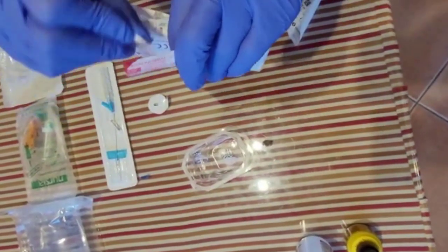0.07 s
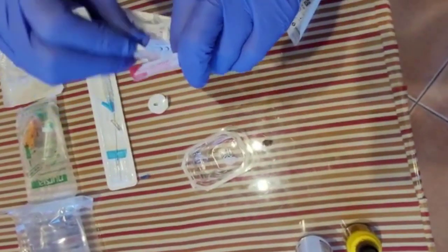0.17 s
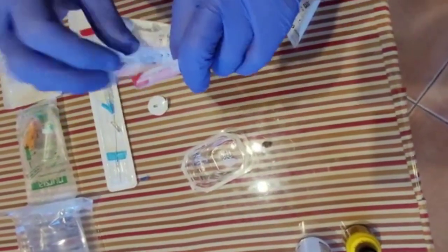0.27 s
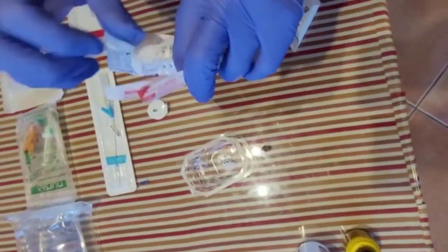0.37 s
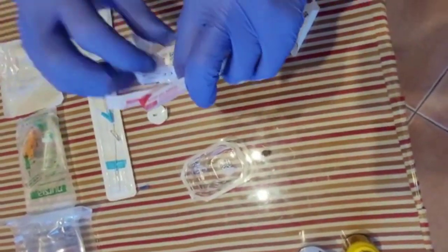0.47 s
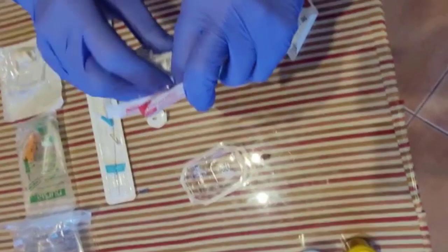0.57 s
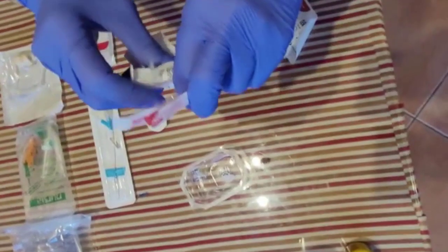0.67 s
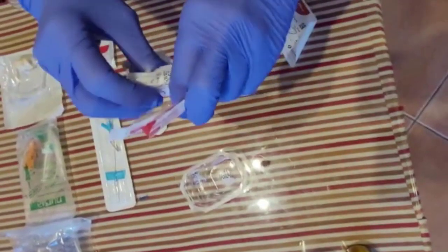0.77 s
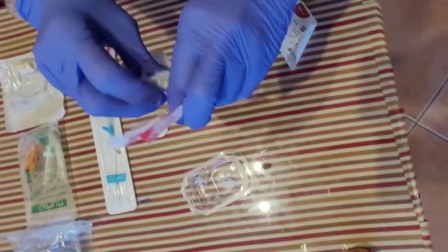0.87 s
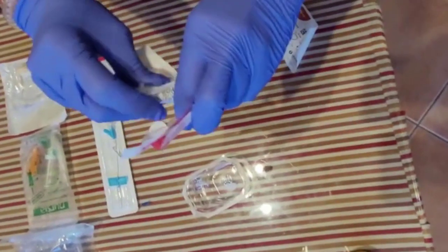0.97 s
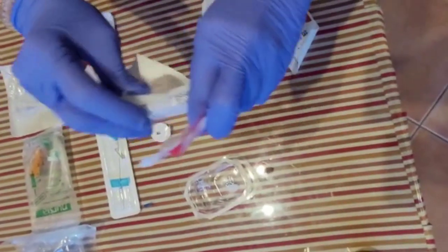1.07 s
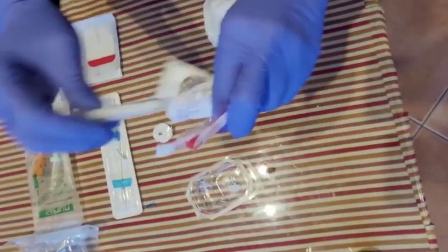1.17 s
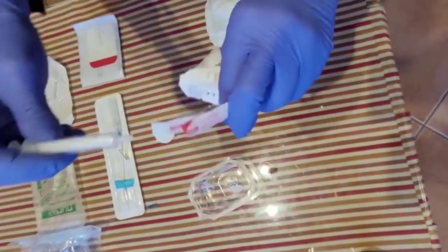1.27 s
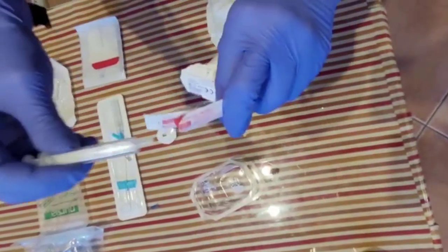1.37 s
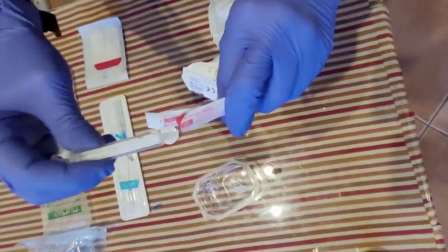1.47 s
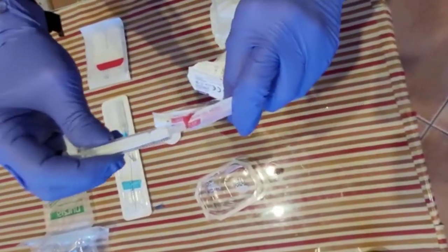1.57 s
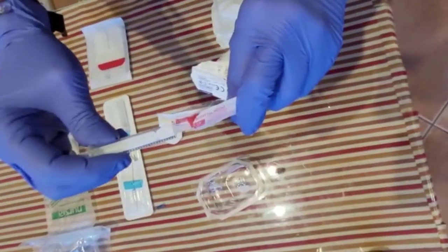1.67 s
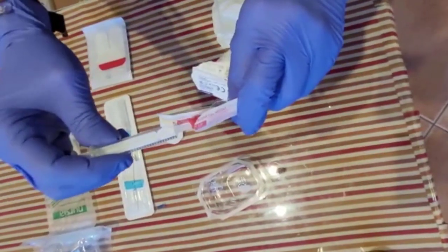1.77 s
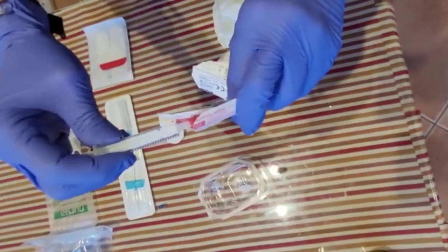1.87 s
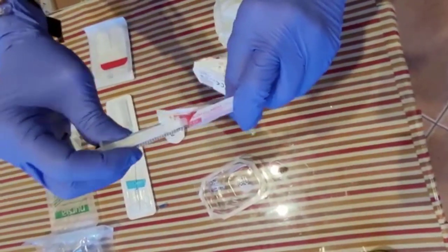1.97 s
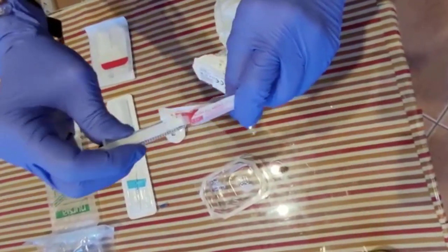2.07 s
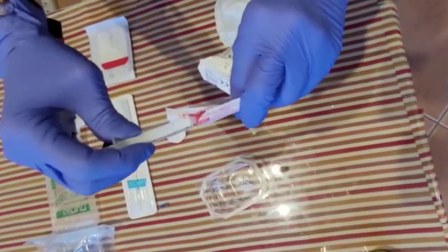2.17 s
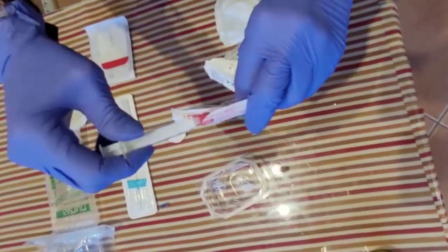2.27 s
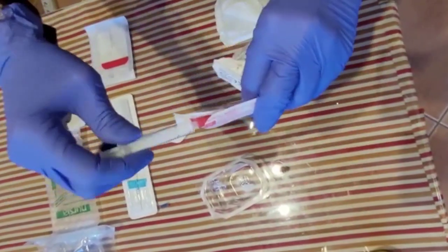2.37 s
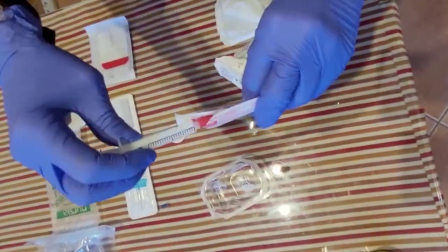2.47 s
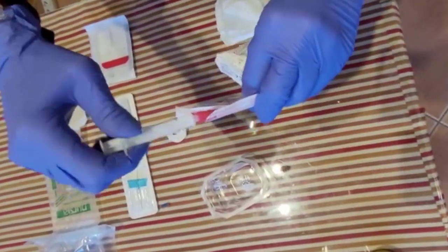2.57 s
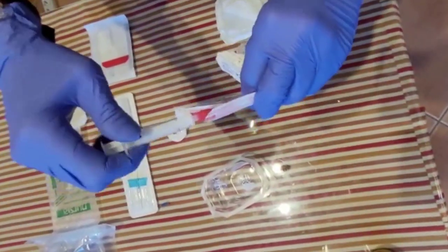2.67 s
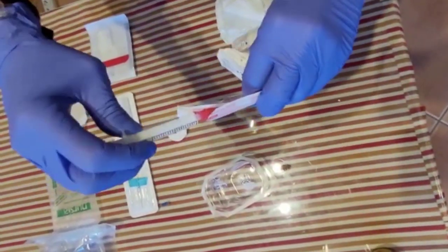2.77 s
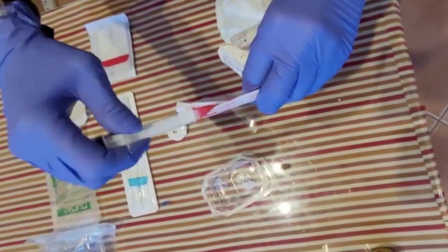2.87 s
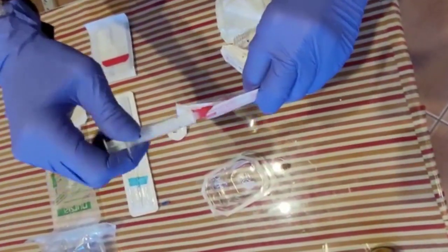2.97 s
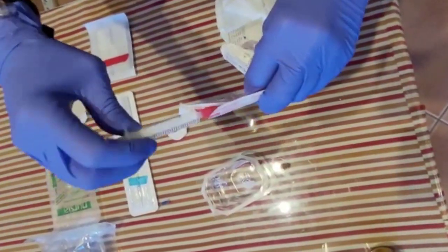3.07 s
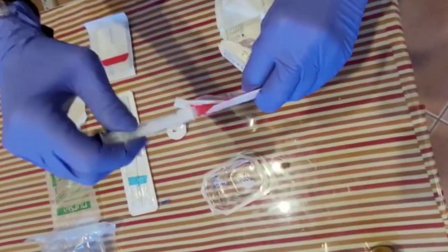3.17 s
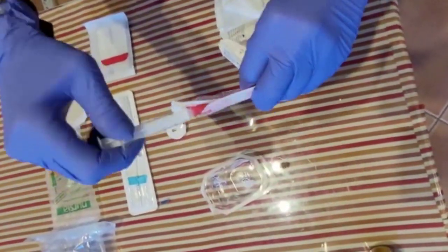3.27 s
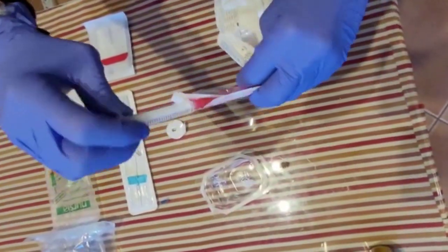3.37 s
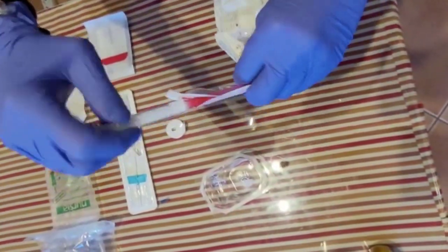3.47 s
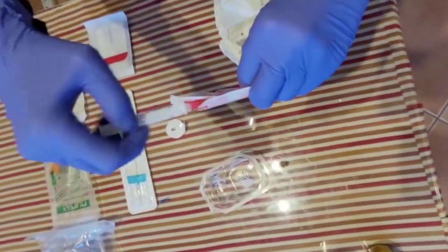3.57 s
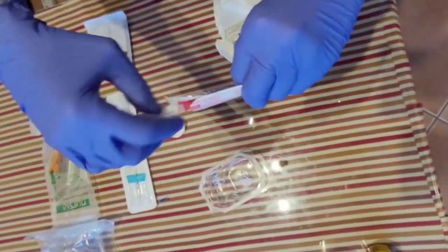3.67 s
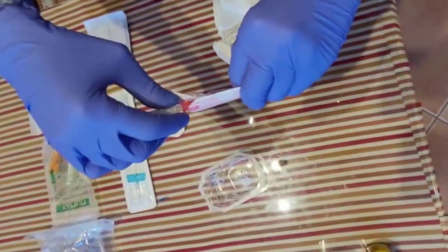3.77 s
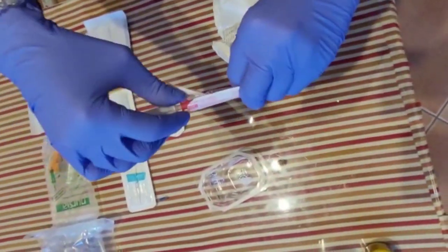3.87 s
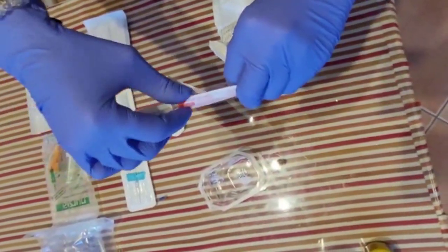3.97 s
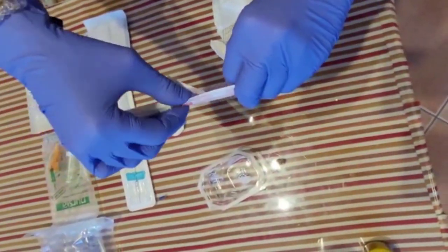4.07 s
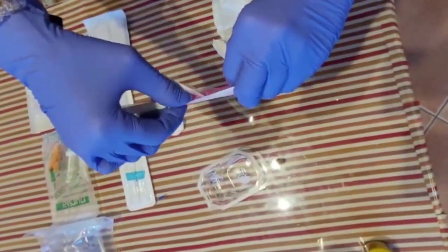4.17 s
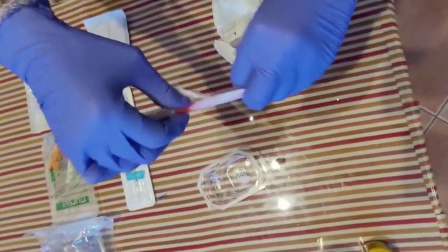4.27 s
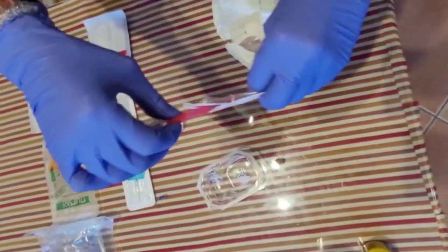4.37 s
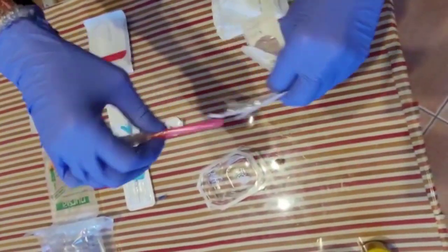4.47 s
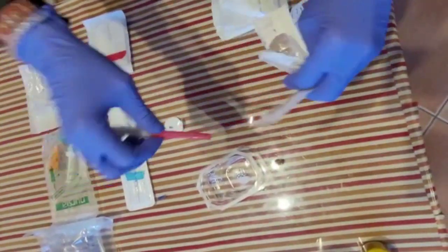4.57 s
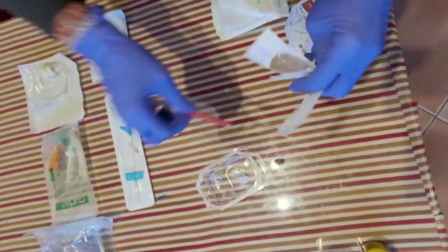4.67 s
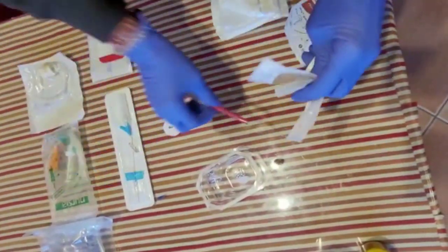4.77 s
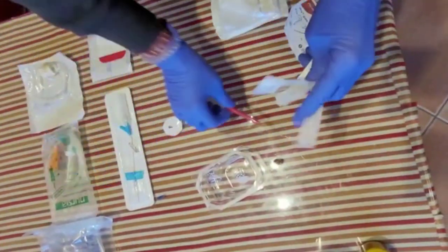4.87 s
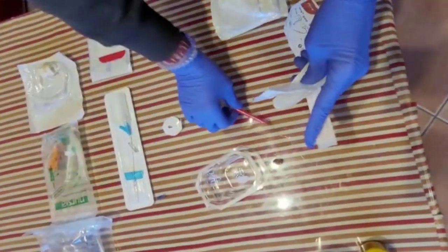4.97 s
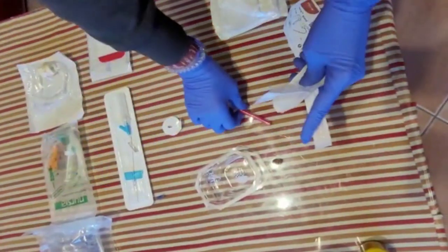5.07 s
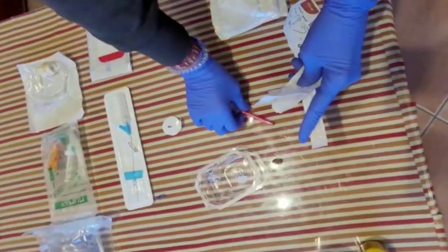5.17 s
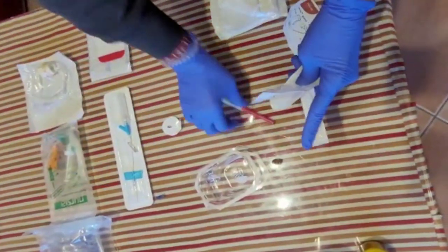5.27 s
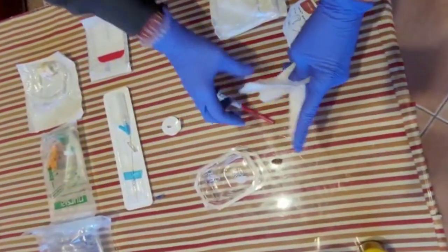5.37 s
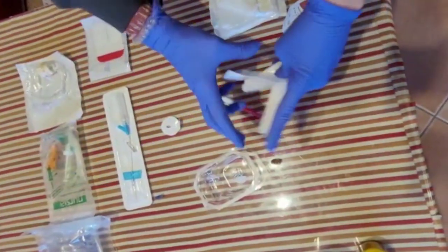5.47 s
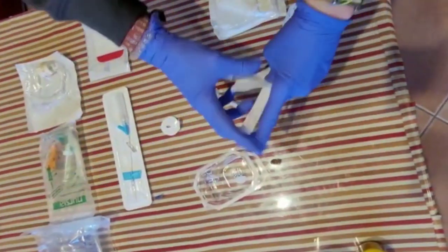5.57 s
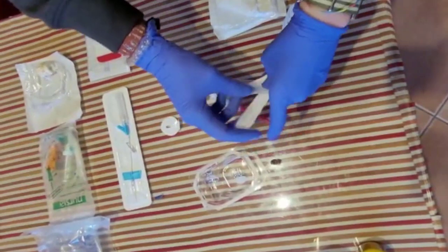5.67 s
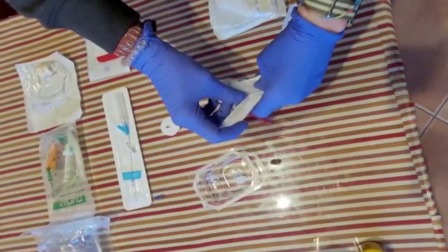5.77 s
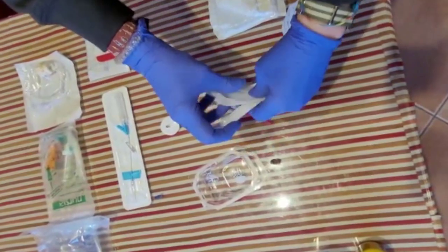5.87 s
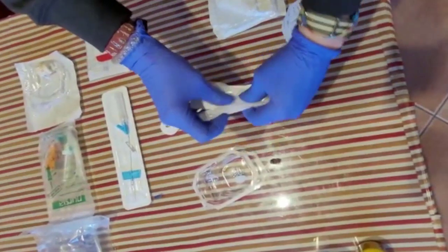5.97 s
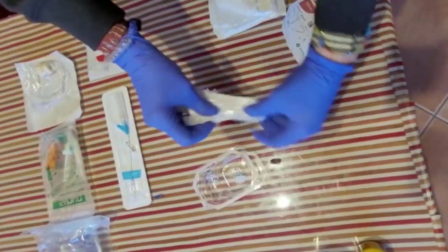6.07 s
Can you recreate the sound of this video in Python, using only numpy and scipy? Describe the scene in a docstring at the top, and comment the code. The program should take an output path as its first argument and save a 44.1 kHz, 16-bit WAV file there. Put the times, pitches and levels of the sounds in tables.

```python
"""A small room, a stereo microphone close to gloved hands; still air and a faint hum run throughout.
From the start the hands peel a paper-and-film sleeve and pull a thin tool free; from about 1.9 s they finger
it lightly; from about 4.3 s the sleeve slides off and is crumpled. Creases are short bursts through resonances,
rustle is tiny ringing clicks over coloured noise, and now and then a damped low ring makes the pack thud."""
import sys
import numpy as np
from scipy import signal
from scipy.fft import rfft, irfft, next_fast_len
from scipy.io import wavfile

SR = 44100
rng = np.random.default_rng(int(sys.argv[2]) if len(sys.argv) > 2 else 0)


def master_out(mix):
    """Clip the mix to full scale and print it as 16-bit PCM to the path in sys.argv[1]."""
    frames = np.transpose(np.atleast_2d(mix))
    ceiling = np.clip(frames, -1, 1)
    pcm = np.round(ceiling * 32767).astype(np.int16)
    wavfile.write(sys.argv[1], SR, pcm)


N = 270244
TIME = np.arange(N) / SR
PORT_LAG_S = .00012  # usual lateness of the right microphone port


def from_db(db):
    """Decibels to amplitude gain."""
    return 10 ** (np.asarray(db) / 20)


def rms_one(x):
    """Scale to rms 1 over all channels."""
    return x / np.sqrt(np.mean(x ** 2) + 1e-20)


def unit_energy(x):
    """Scale each channel to energy 1."""
    return x / np.sqrt(np.sum(x ** 2, axis=-1, keepdims=True) + 1e-20)


def at_hz(points, hz):
    """Read a table of frequencies and values on a log-frequency axis."""
    table_hz, value = np.transpose(points)
    return np.interp(np.log(np.maximum(hz, 1)), np.log(table_hz), value)


def drift(rate):
    """Random wander of rms 1 along straight lines between rate knots a second."""
    knots = rng.standard_normal(8192)
    return rms_one(np.interp(TIME * rate, np.arange(len(knots)), knots))


def cut(x, hz, kind, order=2):
    """Causal Butterworth filter."""
    sos = signal.butter(order, np.clip(hz, 10, .45 * SR), kind, fs=SR, output="sos")
    return signal.sosfilt(sos, x)


def resonate(x, hz, width_hz):
    """Two-pole resonance with a gain of about 1 at its pitch."""
    radius = np.exp(-np.pi * width_hz / SR)
    zeros = np.array([1, 0, -1]) * (1 - radius ** 2) / 2
    poles = [1, -2 * radius * np.cos(2 * np.pi * hz / SR), radius ** 2]
    return signal.lfilter(zeros, poles, x)


def colour(x, spectrum):
    """Filter by a spectrum that drops 30 dB within an octave beyond each end; rms 1."""
    size = next_fast_len(N)
    hz = np.arange(size // 2 + 1) * SR / size
    (low_hz, low_db), (high_hz, high_db) = spectrum[0], spectrum[-1]
    closed = [(low_hz / 2, low_db - 30), *spectrum, (high_hz * 2, high_db - 30)]
    filtered = irfft(rfft(x, size) * from_db(at_hz(closed, hz)), size)
    return rms_one(filtered[..., :N])


def two_ports(source, apart, lag_s=PORT_LAG_S):
    """Mix a shared row, late at the right port (left if negative), with one row of each port's own."""
    apart, lag = np.clip(apart, 0, 1), round(lag_s * SR)
    length = source.shape[1]
    shared = np.array([np.pad(source[0], (max(late, 0), 0))[:length] for late in (-lag, lag)])
    return np.sqrt(1 - apart) * shared + np.sqrt(apart) * source[1:]


def pan(db):
    """Left and right gains of constant power, left over right by db."""
    gains = from_db(np.array([[1], [-1]]) * db / 2)
    return gains / np.sqrt(np.mean(gains ** 2, axis=0))


def add(out, s, sound):
    """Mix a sound in at a time."""
    at = max(round(s * SR), 0)
    out[:, at:at + sound.shape[1]] += sound[:, :N - at]


# Spectrum of the still air, before scaling to rms 1: pitch_hz, relative_level_db
AIR_SPECTRUM = [(15, -41), (25, -12.5), (59, -2.5), (217, -11.5), (309, -9), (384, -12.5), (531, -19.5),
                (754, -15), (887, -17.5), (1260, -18), (1520, -21), (14800, -28.5), (16000, -41.5)]
AIR_DB = -73.5  # rms
# Steady tones of mains hum and faint drone, about which they waver: pitch_hz, rms_db
HUM_TONES = [(99, -84), (260, -88.5), (350, -91)]


def background():
    """Room air is coloured noise; the hum is sines wavering in pitch and level, alike at both ports."""
    air_noise = two_ports(rng.standard_normal((3, N)), apart=0.67)
    out = from_db(AIR_DB) * colour(air_noise, AIR_SPECTRUM)
    for hz, db in HUM_TONES:
        level = from_db(db + 2.74 * drift(5.1)) * np.sqrt(2)
        phase = 2 * np.pi * np.cumsum(hz + 3.6 * drift(9)) / SR
        out += level * np.sin(phase)
    return out


# How long the room takes to die by 60 dB, before the tail's final fade: pitch_hz, decay_s
ROOM_DECAY = [(150, .45), (500, .36), (1400, .36), (3700, .39), (9700, .32), (16000, .26)]
# Strength of the room's ring against the direct sound, before the tail is windowed: pitch_hz, level_db
ROOM_STRENGTH = [(150, -7), (600, -5), (2000, -4), (5000, -4.5), (10000, -5.5), (16000, -7)]


def room(x, first_wall_s=0.0044, build_s=0.0029):
    """Diffuse reflections build up after the first wall and die band by band; bass is most alike at both ports."""
    t, edges_hz = TIME[:SR], np.geomspace(90, 18000, 12)
    tail = np.zeros((2, SR))
    for low, high in zip(edges_hz, edges_hz[1:]):
        hz = np.sqrt(low * high)
        noise = two_ports(rng.standard_normal((3, SR)), apart=hz / (hz + 700))
        dying = cut(noise, [low, high], "band") * from_db(-60 * t / at_hz(ROOM_DECAY, hz))
        band_share = np.sqrt(2 * (high - low) / SR)
        tail += unit_energy(dying) * band_share * from_db(at_hz(ROOM_STRENGTH, hz))
    build_up = np.clip((t - first_wall_s) / build_s, 0, 1)
    fade_out = np.clip(2 - 2.5 * t, 0, 1)  # from 0.4 to 0.8 s
    return signal.fftconvolve(x, tail * build_up * fade_out, axes=1)[:, :N]


# Strokes of the fingers: peeling and pulling free, light fingering, then sliding off and crumpling.
# Levels are before rustle's trims: start_s, length_s, film_db, paper_db, flex_db
FINGER_STROKES = [ (0, 0.033, -62, -69, -79), (0.07, 0.055, -53, -55.5, -70), (0.242, 0.055, -64, -53, -69),
                  (0.314, 0.065, -56, -64.5, -65.5), (0.409, 0.086, -53.5, -56, -74),
                  (.47, .11, -54.5, -55.5, -66.5), (0.592, 0.036, -44.5, -51, -61.5),
                  (0.662, 0.12, -44, -48.5, -65), (0.827, 0.044, -43, -48, -62),
                  (0.916, 0.094, -43.5, -48.5, -65), (1.027, 0.075, -44, -43, -55),
                  (1.119, .12, -36.5, -43, -55.5), (1.877, 0.047, -63, -74.5, -70),
                  (2.009, 0.055, -64, -70, -71.5), (2.322, .15, -55.5, -66.5, -79),
                  (2.584, .09, -55.5, -66.5, -73), (2.754, 0.12, -56, -65.5, -65.5),
                  (2.919, 0.042, -53, -67.5, -66.5), (3.032, 0.06, -57, -65.5, -69),
                  (3.208, 0.054, -53.5, -60, -71.5), (3.322, 0.079, -58.5, -69, -78),
                  (3.5, 0.074, -59, -67.5, -71.5), (3.587, 0.091, -61, -83, -87),
                  (3.752, 0.13, -57, -75, -74), (3.874, 0.23, -64.5, -81, -88),
                  (4.292, 0.13, -48.5, -57.5, -70), (4.43, 0.091, -47, -49.5, -76),
                  (4.772, 0.031, -74, -56.5, -77), (4.929, 0.053, -50, -46.5, -70),
                  (5.138, 0.02, -59, -38.5, -50), (5.308, 0.037, -42.5, -41, -58),
                  (5.343, 0.079, -61.5, -53, -70.5), (5.579, 0.034, -61, -72, -73),
                  (5.638, 0.12, -53.5, -60, -63.5), (5.733, 0.14, -53.5, -52, -58.5),
                  (5.869, 0.047, -45, -44.5, -50.5), (5.936, 0.11, -40.5, -44.5, -50),
                  (6.08, 0.055, -46, -46.5, -61)]
# The pack merely held, before the same trims: film_db, paper_db, flex_db
HELD_LEVELS = [-79.5, -83, -80.5]
ATTACK_SHARE, RELEASE_S = 0.3, .009  # share of a stroke's length; time constant once it stops


def stroke_gains():
    """Film, paper and flexing share each stroke's attack, hold and release; overlaps add in power."""
    power = from_db(HELD_LEVELS)[:, None] ** 2 * np.ones(N)
    t = TIME[:SR // 2]
    for start, length, *levels_db in FINGER_STROKES:
        attack = np.clip(t / max(ATTACK_SHARE * length, 1e-3), 0, 1)
        release = np.exp(-np.maximum(t - length, 0) / RELEASE_S)
        add(power, start, (from_db(levels_db)[:, None] * attack * release) ** 2)
    return np.sqrt(power)


def crackle(spectrum, per_s, spread_db, smooth, flutter_db, apart):
    """Clumps of tiny buckles ring a few cycles in one of 12 bands over smooth sliding friction; rms 1."""
    born = rng.random(N) < per_s * from_db(4 * drift(70)) / SR
    sizes = born * from_db(spread_db * np.minimum(rng.exponential(1, N), 3.5))
    clicks = two_ports(sizes * rng.choice([-1, 1], (3, N)), apart)
    band = rng.integers(0, 12, N)
    pitches_hz = np.linspace(spectrum[0][0], min(spectrum[-1][0], .4 * SR), 12)
    width_hz = 1.5 * (pitches_hz[1] - pitches_hz[0])
    grains = np.zeros((2, N))
    for k, hz in enumerate(pitches_hz):
        grains += resonate(clicks * (band == k) + 1e-18, hz, width_hz)
    friction = two_ports(rng.standard_normal((3, N)), apart)
    mixed = colour(grains, spectrum) + smooth * colour(friction, spectrum)
    return rms_one(mixed * from_db(flutter_db * drift(60)))


# Where the wrapper is being bent, positive to the left: time_s, left_over_right_db
BEND_PLACE = [(0, 4), (.24, 5.5), (.41, 2), (.83, 3), (1.2, 2), (2.0, 0.5), (2.8, 4), (3.1, 2), (3.7, 2),
              (4.4, 3.5), (5.0, -1), (5.3, 0.5), (5.8, 5), (6.13, 1)]


def side_db_at(s):
    """Left-over-right level of the bending wrapper at a time."""
    return np.interp(s, *np.transpose(BEND_PLACE))


# Spectra of film hiss, paper rub and pack flexing, before scaling to rms 1: pitch_hz, relative_level_db
FILM_SPECTRUM = [(2800, -22), (4300, -4), (5500, -1), (7200, 0), (9500, -3), (13000, -4), (16000, -5)]
PAPER_SPECTRUM = [(700, -16), (1100, -3.5), (1700, -2.5), (2600, 1), (3800, 1), (5000, -5), (8000, -24.5)]
FLEX_SPECTRUM = [(90, -21.5), (170, -17), (260, -6.5), (380, -5), (520, -7), (750, -9.5), (1300, -17.5)]


def rustle(film_db=-2.5, paper_db=-0.5, flex_db=-4.0):
    """Film hisses and paper rubs as crackle, and the pack flexes as low noise, as the hands work."""
    film_gain, paper_gain, flex_gain = stroke_gains()
    film = crackle(FILM_SPECTRUM, per_s=550, spread_db=4.5, smooth=1.0, flutter_db=3.0, apart=0.7)
    paper = crackle(PAPER_SPECTRUM, per_s=500, spread_db=3.5, smooth=0.92, flutter_db=1.6, apart=0.55)
    flex = colour(two_ports(rng.standard_normal((3, N)), apart=0.4), FLEX_SPECTRUM)
    flex = flex * from_db(3.2 * drift(40))
    out = film_gain * from_db(film_db) * film
    out += paper_gain * from_db(paper_db) * paper
    out += flex_gain * from_db(flex_db) * flex
    return out * pan(0.55 * side_db_at(TIME))  # panned less widely than the snaps


# Dull bumps of hands and pack, peaks before trim and pan: start_s, peak_db, pitch_hz
BUMPS = [(1.146, -41, 433), (1.181, -38.5, 295), (1.233, -28.5, 625), (1.25, -30.5, 249.3),
         (2.77, -48.5, 570), (2.836, -45, 403), (3.804, -48, 730), (4.669, -55, 355), (5.136, -39, 372),
         (5.159, -46, 454), (5.883, -35, 273), (6.032, -38.5, 510)]


def thuds(trim_db=-1.5, die_s=0.0059, ring_q=3.67, puff_db=-19.5):
    """A soft bump flaps the slack pack: a few damped cycles and a puff of low noise, slightly left."""
    out, t = np.zeros((2, N)), np.arange(4096) / SR
    for s, db, hz in BUMPS:
        push = two_ports(rng.standard_normal((3, len(t))) * np.exp(-t / die_s), apart=0.072)
        flap = unit_energy(resonate(push, hz, hz / ring_q))
        puff = from_db(puff_db) * unit_energy(cut(push, [120, 330], "band"))
        thud = cut(flap + puff, 2100, "low")
        add(out, s, thud / np.abs(thud).max() * from_db(db + trim_db) * pan(2.3))
    return out


def table_bounce(snap, delay_s=0.0022, smear_s=0.0011, bounce_db=-7.5):
    """The table and the things on it scatter a snap back a moment later, differently to each port."""
    late = np.arange(256) / SR - delay_s * rng.uniform(.8, 1.2)
    scatter = rng.standard_normal((2, len(late))) * (late > 0) * np.exp(-np.abs(late) / smear_s)
    bounce = signal.fftconvolve(snap, unit_energy(scatter), axes=1)[:, :snap.shape[1]]
    return snap + from_db(bounce_db) * bounce


# Lesser creases: mean rate, level over the film's untrimmed rustle, and spread
TICKS_PER_S, TICK_OVER_RUSTLE_DB, TICK_SPREAD_DB = 22, 12, 2.5
# Their middle pitch, and crack and sheet levels before the snaps' trims
TICK_HZ, TICK_CRACK_DB, TICK_SHEET_DB = 5400, -15.5, -24.5


def ticks(count=256):
    """Lesser creases give way at random, as strong as the film is busy; rows like those of the snaps."""
    draws = rng.standard_normal((count, 4))
    gaps_s = (draws[:, 0] ** 2 + draws[:, 1] ** 2) / 2 / TICKS_PER_S  # exponential waiting times
    busy_db = 20 * np.log10(stroke_gains()[0])
    rows = []
    for s, size, pitch in zip(np.cumsum(gaps_s), draws[:, 2], draws[:, 3]):
        if s < TIME[-1]:
            level_db = busy_db[int(s * SR)] + TICK_OVER_RUSTLE_DB + TICK_SPREAD_DB * size
            ring_hz = TICK_HZ * 2 ** np.clip(.3 * pitch, -1, .5)
            rows.append((s, level_db, ring_hz, TICK_CRACK_DB, TICK_SHEET_DB))
    return rows


# A hard snap is over sooner: shiver time at the usual strength, and the rise in strength that halves it
SHIVER_S, USUAL_SNAP_DB, HALVING_DB = 0.0012, -27, 18.5
# Creases buckling, levels before the trims in snaps(); crack and sheet are relative to the facet's ring:
# start_s, level_db, pitch_hz, crack_db, sheet_db
CREASES = [(0.0745, -25, 2640, -1.5, -20), (0.1166, -24, 5940, -9, -21.5), (0.1757, -32, 5100, -17, -36),
           (0.199, -26, 6500, -16, -32), (0.2099, -23.5, 5830, -21, -32), (0.2433, -16.5, 6900, -33, -29.5),
           (0.3203, -30.5, 6000, -27, -35), (0.3483, -33.5, 2140, -4, -27), (0.408, -22.5, 2400, -6, -14.5),
           (0.4402, -27, 6500, -19, -34), (0.5531, -29, 4900, -15, -19), (0.601, -28, 4750, -17, -28),
           (0.6142, -26.5, 6330, -10, -20), (0.6751, -25.5, 4400, -10, -16.5),
           (0.7118, -27.5, 7440, -4, -13), (0.7449, -17.5, 7500, -23, -16), (0.7544, -22, 6740, -23, -29),
           (0.8138, -27.5, 2620, -7, -9), (0.8367, -11.5, 3060, -14.5, -30),
           (0.8544, -23.5, 3300, -13, -22.5), (0.9244, -20, 2900, -4.5, -18), (1.073, -27.5, 2670, 1, -5),
           (1.1458, -16, 4400, -18, -22), (1.1519, -12.5, 4360, -11.5, -24.5),
           (1.2362, -16, 4500, -14.5, -26.5), (1.8905, -43, 7670, -19, -21.5),
           (2.0182, -35, 8400, -16.5, -28.5), (2.0741, -38.5, 7140, -17, -20),
           (2.1894, -42, 8050, -10.5, -48), (2.4064, -35, 7600, -14, -26.5), (2.675, -31.5, 6230, -30, -54),
           (2.768, -32.5, 6800, -26, -28), (2.7947, -33, 4460, -11, -34), (2.833, -29.5, 7400, -16, -20.5),
           (3.107, -31, 7000, -7, -17), (3.2078, -33.5, 6680, -21, -29), (3.2156, -30.5, 5370, -19, -36),
           (3.5062, -34.5, 6500, -29.5, -35), (3.6336, -41, 5270, -4.5, -41),
           (3.7458, -41, 7600, -12, -25.5), (3.8039, -31, 6870, -20.5, -24),
           (3.904, -37.5, 5230, -13.5, -26), (3.925, -40, 5670, -23, -36), (4.1799, -45, 7400, -14.5, -31),
           (4.3929, -29.5, 6960, -10, -29), (4.6881, -37, 7500, -22, -39),
           (4.7802, -22.5, 5000, -15.5, -21), (4.8877, -43.5, 3400, -1, -13),
           (4.9164, -25, 6700, -26, -19.5), (4.9527, -18.5, 5200, -20, -30), (4.9994, -29, 8160, -12, -27),
           (5.1181, -28, 7050, -19, -15.5), (5.1399, -16.5, 6370, -28, -33), (5.1785, -35, 4260, -14, -19),
           (5.2904, -33, 4250, -16, -12), (5.3109, -24, 3840, -19, -21.5), (5.334, -26, 2690, 2, -16.5),
           (5.7059, -26.5, 4400, -13.5, -22), (5.7649, -20, 4820, -20.5, -21.5),
           (5.954, -23, 5400, -13, -27), (5.9774, -22.5, 2930, -3, -24), (6.0008, -20.5, 4900, 0, -26),
           (6.0252, -18.5, 5300, -12, -32), (6.0314, -21, 6400, -20, -16), (6.059, -23.5, 2780, -5, -15.5),
           (6.0853, -14, 4800, -7.5, -17), (6.105, -23, 5160, -24, -17.5)]


def snaps(trim_db=11.5, crack_trim_db=7.0, sheet_trim_db=14.0, ring_q=1.74, crack_hz=12000,
          crack_width_hz=6500, sheet_hz=1850, shiver=0.48, creep_s=.0005, pop_after_s=.0008, lag_s_per_db=0.26):
    """A crease creeps, pops and shivers; its facet rings, its edge cracks and the sheet around it answers."""
    out, t = np.zeros((2, N)), np.arange(-128, 896) / SR
    for s, db, ring_hz, crack_db, sheet_db in [*CREASES, *ticks()]:
        side_db = side_db_at(s)
        shiver_s = SHIVER_S * .5 ** ((db - USUAL_SNAP_DB) / HALVING_DB)
        envelope = np.exp(-np.abs(t) / np.where(t < 0, creep_s, max(shiver_s, 1e-4)))
        burst = shiver * rng.standard_normal((3, len(t))) * envelope
        burst[0] += t == 0  # the pop
        # this lag nearly always outlasts the burst: the far port then gets only its own shiver, no pop
        burst = two_ports(unit_energy(burst), apart=0.28, lag_s=side_db * lag_s_per_db)

        facet = resonate(burst, ring_hz, ring_hz / ring_q)
        facet = unit_energy(cut(facet, 0.59 * ring_hz, "high", order=3))
        varied_sheet_hz = sheet_hz * from_db(rng.normal(0, 4.5))
        sheet = unit_energy(cut(resonate(burst, varied_sheet_hz, 910), 660, "high", order=3))
        crack = unit_energy(cut(resonate(burst, crack_hz, crack_width_hz), [7500, 15500], "band"))

        snap = facet + from_db(sheet_db + sheet_trim_db) * sheet
        snap += from_db(crack_db + crack_trim_db) * crack
        snap = unit_energy(snap) * from_db(db + trim_db)
        add(out, s + pop_after_s + t[0], table_bounce(snap) * pan(side_db))
    return out


def scene():
    """The wrapper close by, its ring in the small room, and the background."""
    wrapper = rustle() + thuds() + snaps()
    return background() + room(wrapper) + wrapper


def record(dry):
    """A steep elliptic low-pass takes off the top above 16.2 kHz."""
    sos = signal.ellip(10, .1, 80, 16200, fs=SR, output="sos")
    return signal.sosfilt(sos, dry)


dry = scene()
out = record(dry)
master_out(out)
```